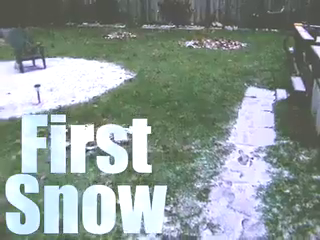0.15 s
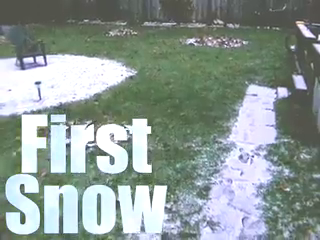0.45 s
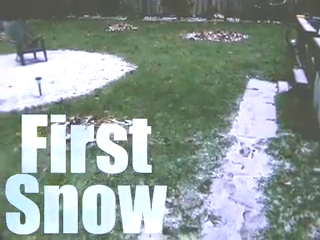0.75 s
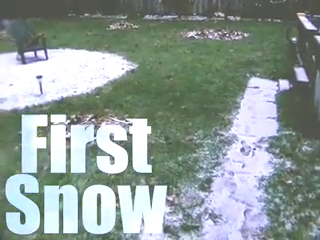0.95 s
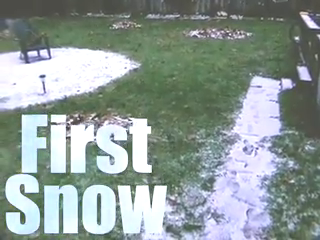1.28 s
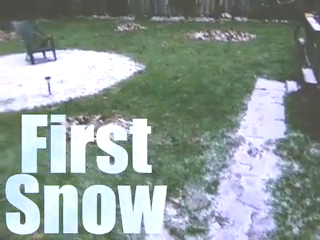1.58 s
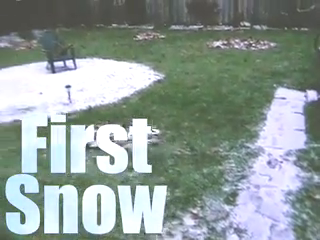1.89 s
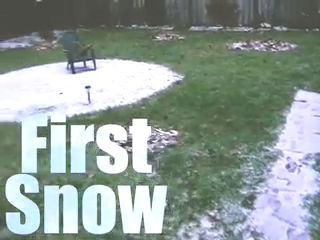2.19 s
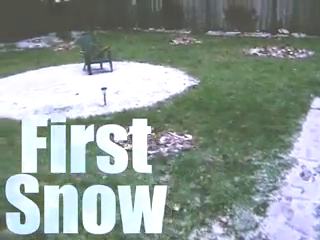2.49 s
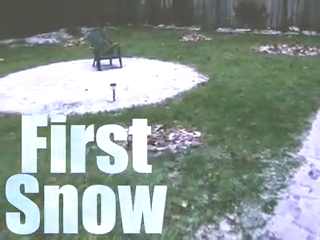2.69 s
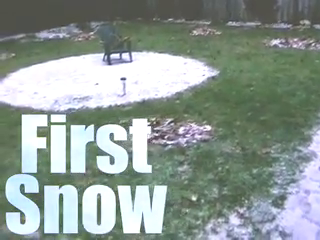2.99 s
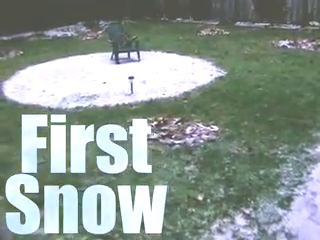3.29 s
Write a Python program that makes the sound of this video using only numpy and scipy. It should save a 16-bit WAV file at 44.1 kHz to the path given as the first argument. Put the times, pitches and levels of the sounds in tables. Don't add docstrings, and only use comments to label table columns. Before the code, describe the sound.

Ice pellets and freezing rain patter over a garden for about 3.4 seconds, after a very quick fade-in. A dense, bright, wide stereo hiss carries fine crackling flurries, slightly stronger around 1.1 to 2 seconds, easing at the end. Sharp close ticks and small knocks scatter irregularly, notably near 0.4, 1.25 and 1.5. Underneath lie quiet town rumble and a faint machine hum, swelling near 2.5, slowly rising in pitch.

```python
import sys
import numpy as np
from scipy import signal
from scipy.fft import rfft, irfft, next_fast_len
from scipy.io import wavfile
from scipy.ndimage import uniform_filter1d, map_coordinates

SR = 44100
rng = np.random.default_rng(int(sys.argv[2]) if len(sys.argv) > 2 else 0)


def natural_amplitude(level_db):
    exponent = np.asarray(level_db, float) / 20
    return 10 ** exponent


def master_out(mix):
    frames = np.transpose(np.atleast_2d(mix))
    ceiling = np.clip(frames, -1, 1)
    pcm = np.round(ceiling * 32767).astype(np.int16)
    wavfile.write(sys.argv[1], SR, pcm)


N = 152145

# (time [s], level [dB])
FALL_STRENGTH = [
    (0.1, -18.5),
    (0.26, -20),
    (1.14, -18),
    (1.95, -18.5),
    (2.39, -20),
    (2.74, -18.5),
    (3.45, -21),
]
# (frequency [Hz], level [dB])
ICE_COLOUR = [(300, -29.5), (500, -15), (1100, -8), (1700, -9.5), (4500, -3.5), (7000, -3.5), (9500, 1),
              (12200, 4.5)]
# (time [s], level [dB])
TOWN_LEVEL = [
    (0.1, -37),
    (0.63, -37),
    (0.67, -39.5),
    (2.24, -36),
    (2.3, -43),
    (2.41, -33),
    (2.44, -38),
    (2.61, -34.5),
    (2.64, -35),
    (3.45, -35.5),
]
# (frequency [Hz], level [dB])
RUMBLE_COLOUR = [(15, -31), (40, -3.5), (70, -4.5), (150, -5), (260, -4.5), (340, -16), (500, -33),
                 (900, -80)]
# (frequency [Hz], width [Hz], boost [dB])
BOOMS = [(101.4, 51, 6), (128.2, 19, 6), (191.7, 26.7, 8), (480, 4.7, 2)]
# (time [s], pitch [Hz], level [dB])
MACHINE_HUM = [
    (0.1, 51.8, -42.5),
    (0.42, 52, -48),
    (0.82, 51.8, -47),
    (0.92, 52.1, -43),
    (1.69, 53.0, -44.5),
    (2.05, 54.16, -47),
    (2.44, 54.7, -48),
    (2.55, 54.35, -38),
    (3.45, 55, -40.5),
]
# (frequency [Hz], width [Hz], level [dB])
WHINES = [(490, 14, -63), (914, 18, -60.5), (1112, 17, -56.5), (1393, 53, -53.5)]
# (time [s], peak level [dB])
SINGLE_PELLETS = [(0.1351, -13), (0.1574, -15), (0.18, -11), (0.1844, -16), (0.3376, -14), (0.5332, -15),
                  (0.8265, -11), (0.8544, -14), (0.8774, -17), (0.9448, -11), (0.9544, -14), (1.035, -12),
                  (1.2101, -13), (1.2496, -10), (1.2755, -12), (1.4716, -14), (1.5229, -10), (1.7474, -15),
                  (1.9101, -10), (2.2294, -17), (2.3994, -16), (2.4428, -12), (2.5915, -15), (2.6294, -17),
                  (2.811, -15), (2.824, -12), (2.8479, -16), (2.9507, -14), (3.2655, -16)]
# (time [s], bright tick level [dB], knock pitch [Hz], knock level [dB])
SHARD_SPRAYS = [(.139, -28, 3800, -27), (0.177, -16.5, 5830, -19.5), (0.266, -19.5, 4280, -29.5),
                (0.377, -27, 4030, -39), (.385, -24, 1290, -26.5), (.383, -20, 2270, -20),
                (.390, -27, 2600, -17.5), (0.391, -10, 5400, -19), (0.45, -19, 3850, -31.5),
                (0.696, -20, 4600, -31), (0.823, -30, 2370, -28), (0.971, -20.5, 4380, -26.5),
                (1.248, -19, 5050, -41), (1.492, -23, 1587, -26), (1.495, -24, 2340, -25),
                (1.506, -31, 3320, -25), (1.539, -18, 5140, -25), (1.746, -19, 5050, -25.5),
                (2.095, -19, 4800, -22), (2.438, -18, 3000, -30), (2.59, -20, 5440, -31),
                (3.265, -24, 2280, -31)]
# (frequency [Hz], correlation [-1 to 1])
LEFT_RIGHT_LIKENESS = [(60, 0.79), (150, 0.99), (370, 0.79), (920, 1), (2290, 0.74), (5680, 0.025),
                       (14100, -0.063)]
# (frequency [Hz], left over right [dB])
LEFT_LOUDER = [(60, 2.5), (180, 2.5), (530, 2.5), (1590, -0.5), (4730, 1), (14100, -0.5)]
# (frequency [Hz], phase lead [rad])
LEFT_LEAD = [(60, -0.37), (1500, -0.43), (2500, 0.29)]

PELLETS_PER_S = 1100
NEAR_DB, FAR_DB, PELLET_SIZE_DB, FLURRY_DB = -6, -3.5, 1, 1.5
TICK_S, TICK_SPREAD = 0.0035, 0.51
PORT_LAG_S = 0.00018
CHIP_HZ, CHIP_DB, REBOUND_DB, CRACK_DB = 11600, 5, -7, -8
SNAP_S, SNAP_SPREAD = 0.002, 0.2
SHARD_SIZE_DB, SPRAY_S = 2, 0.011
KNOCK_S, KNOCK_PITCH_SPREAD = 0.009, 0.17
NOTCH_HZ, NOTCH_WIDTH_HZ, NOTCH_LEFT = 7892, 2600, 0.0082
TOP_HZ, TOP_EDGE_HZ = 13500, 14
GATE_DB, GATE_SWING_DB, GATE_FROM_HZ = -15, 3, 4700
START_S, START_DB, FADE_S = 0.034, -13, 0.055


def unit(x):
    return x / np.sqrt(np.mean(x ** 2) + 1e-20)


def along(points, hz):
    f, value = np.transpose(points)
    return np.interp(np.log(hz + 1), np.log(f + 1), value)


def curves(rows):
    s, *columns = np.transpose(rows)
    return [np.interp(np.arange(N) / SR, s, column) for column in columns]


def wobble(rate):
    return map_coordinates(rng.standard_normal(400), [np.arange(N) * rate / SR])


def filtered(x, response):
    m = next_fast_len(N + 8192)
    return irfft(rfft(x, m) * response(np.fft.rfftfreq(m, 1 / SR)), m)[..., :N]


def ice_coloured(x):
    return filtered(x, lambda hz: natural_amplitude(along(ICE_COLOUR, hz)))


def resonance(hz, centre_hz, width_hz):
    return 1 / (1 + (2 * (hz - centre_hz) / width_hz) ** 2)


def diffuse(patchy_db):
    z = signal.stft(rng.standard_normal((2, N)), nperseg=256)[2]
    patches = uniform_filter1d(rng.standard_normal(z.shape[1:]), size=9, axis=0)
    patches = uniform_filter1d(patches, size=12, axis=1)
    pair = signal.istft(z * natural_amplitude(patchy_db * unit(patches)), nperseg=256)[1][:, :N]

    def middle_and_side(hz):
        angle = np.arccos(np.clip(along(LEFT_RIGHT_LIKENESS, hz), -1, 1)) / 2
        return np.array([np.cos(angle), np.sin(angle)])

    mid, side = filtered(pair, middle_and_side)
    return np.array([mid + side, mid - side])


def ticks(s, db, t60, spread, hz=None, wide=1):
    k = np.arange(384)
    life = rng.standard_normal(len(s))
    side = wide * rng.uniform(-0.82, 1, len(s))
    decay = natural_amplitude(-60 * k / SR / (t60 * np.exp(spread * life))[:, None])
    if hz is None:
        wave = rng.standard_normal((len(s), len(k)))
    else:
        cycles = hz[:, None] * k / SR
        wave = np.sin(2 * np.pi * cycles) * (1 - np.exp(-cycles))
    burst = natural_amplitude(db)[:, None] * decay * wave
    ports = []
    for ear in (1, -1):
        start = np.round((s + ear * side * PORT_LAG_S / 2) * SR).astype(int)
        at = np.clip(start[:, None] + k, 0, N)
        ports.append(np.bincount(at.ravel(), burst.ravel(), N + 1)[:N])
    return np.array(ports)


def sleet():
    strength_db, = curves(FALL_STRENGTH)
    count = int(PELLETS_PER_S * N / SR)
    times = rng.uniform(0, N / SR, count)
    near = ticks(times, PELLET_SIZE_DB * rng.exponential(1, count), TICK_S, TICK_SPREAD)
    flurry_db = FLURRY_DB * (0.32 * wobble(6.55) + 0.27 * wobble(12) + 1.1 * wobble(45))
    crackle = natural_amplitude(NEAR_DB) * unit(near * natural_amplitude(flurry_db))
    hiss = natural_amplitude(FAR_DB + 0.2 * wobble(9.2)) * unit(diffuse(patchy_db=1.37))
    return natural_amplitude(strength_db) * unit(ice_coloured(crackle + hiss))


def town():
    level_db, = curves(TOWN_LEVEL)

    def colour(f):
        booms = 1 + sum(natural_amplitude(db) * resonance(f, hz, width) for hz, width, db in BOOMS)
        return natural_amplitude(along(RUMBLE_COLOUR, f)) * booms

    return natural_amplitude(level_db) * unit(filtered(diffuse(patchy_db=-0.13), colour))


def machine_hum():
    hum_hz, hum_db = curves(MACHINE_HUM)
    turn = 2 * np.pi * np.cumsum(hum_hz + 1.03 * wobble(8)) / SR
    left_right = np.array([[0.3], [-0.3]])
    deep = np.sqrt(2) * natural_amplitude(hum_db + 1.5 * wobble(6)) * np.sin(turn + left_right)
    octave = natural_amplitude(-41.5 + 1.33 * wobble(4.02)) * np.sin(2 * turn + 0.44 * wobble(4.9))
    return deep + octave


def machine_whines():
    air = diffuse(patchy_db=-1)
    tones = 0
    for hz, width, db in WHINES:
        tones = tones + natural_amplitude(db) * unit(filtered(air, lambda f: resonance(f, hz, width)))
    return tones


def single_pellets():
    s, db = np.transpose(SINGLE_PELLETS)[:, :, None]
    late = rng.uniform(0.001, 0.004, (len(SINGLE_PELLETS), 3))
    late = late * (np.arange(3) > 0)
    times = (s + late).ravel()
    level_db = (db + CHIP_DB + REBOUND_DB * (late > 0)).ravel()
    pitch = CHIP_HZ * np.exp(0.07 * rng.standard_normal(len(times)))
    ring = ticks(times, level_db, SNAP_S, SNAP_SPREAD, pitch, wide=0.3)
    crack = ice_coloured(ticks(times, level_db + CRACK_DB, SNAP_S, SNAP_SPREAD))
    return ring + crack


def shard_sprays(count=24):
    s, bright_db, hz, knock_db = np.transpose(SHARD_SPRAYS)[:, :, None]
    shape = (len(SHARD_SPRAYS), count)
    late = rng.gamma(2, 0.3, shape)
    times = (s + late * SPRAY_S).ravel()
    size_db = SHARD_SIZE_DB * (rng.standard_normal(shape) - 2 * late)
    pitch = (hz * np.exp(KNOCK_PITCH_SPREAD * rng.standard_normal(shape))).ravel()
    bright = ice_coloured(ticks(times, (bright_db + size_db).ravel(), 0.0058, SNAP_SPREAD))
    knocks = ticks(times, (knock_db + size_db).ravel(), KNOCK_S, SNAP_SPREAD, pitch)
    return bright + knocks


def scene():
    return sleet() + town() + machine_hum() + machine_whines() + single_pellets() + shard_sprays()


def camera_response(f):
    away = NOTCH_HZ ** 2 - f * f
    damping = 1j * f * NOTCH_WIDTH_HZ
    notch = (away + damping * NOTCH_LEFT) / (away + damping)
    shoulder_db = -3.5 * np.clip((f - 12600) / 900, 0, 1)
    edge_db = -18 / (1 + np.exp(np.clip((TOP_HZ - f) / TOP_EDGE_HZ, -50, 50)))
    slope_db = -0.04 * np.maximum(f - TOP_HZ, 0)
    uneven = along(LEFT_LOUDER, f) * np.log(10) / 20 + 1j * along(LEFT_LEAD, f)
    ports = np.exp(uneven * np.array([[0.5], [-0.5]]))
    return notch * natural_amplitude(shoulder_db + edge_db + slope_db) * ports


def drop_weak_treble(x):
    mid_side = np.array([x[0] + x[1], x[0] - x[1]]) / 2
    hz, t, z = signal.stft(mid_side, SR, "cosine", nperseg=2048)
    power = np.abs(z[:, :-1].reshape(2, -1, 8, len(t))) ** 2
    bands = np.pad(np.repeat(power.mean(2), 8, axis=1), ((0, 0), (0, 1), (0, 0)))
    treble = (hz > GATE_FROM_HZ) & (hz < TOP_HZ)
    swing = uniform_filter1d(rng.standard_normal((2, 1, len(t))), size=2) * np.sqrt(2)
    limit = bands[:, treble].mean(1, keepdims=True) * natural_amplitude(2 * (GATE_DB + GATE_SWING_DB * swing))
    keep = (hz < GATE_FROM_HZ)[:, None] | (bands > limit)
    mid, side = signal.istft(z * np.maximum(keep, 0.06), SR, "cosine", nperseg=2048)[1][:, :N]
    return np.array([mid + side, mid - side])


def band_limit(x):
    return signal.sosfilt(signal.butter(12, 14710, fs=SR, output="sos"), x)


def record(dry):
    heard = drop_weak_treble(filtered(dry, camera_response))
    t = np.arange(N) / SR - START_S
    fade = (t > 0) * natural_amplitude(START_DB * np.clip(1 - t / FADE_S, 0, 1))
    return band_limit(heard * fade)


dry = scene()
out = record(dry)
master_out(out)
```